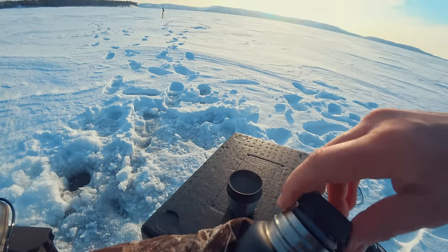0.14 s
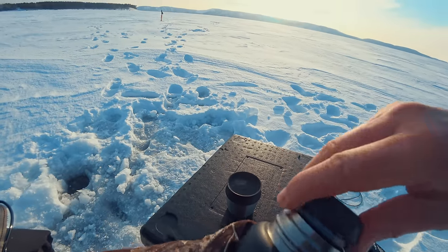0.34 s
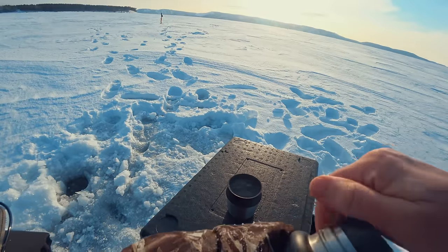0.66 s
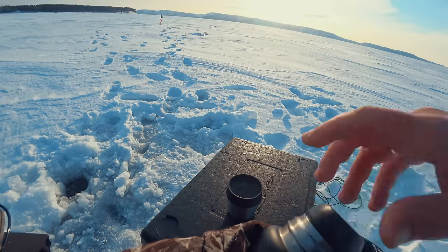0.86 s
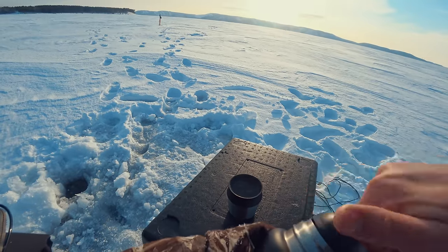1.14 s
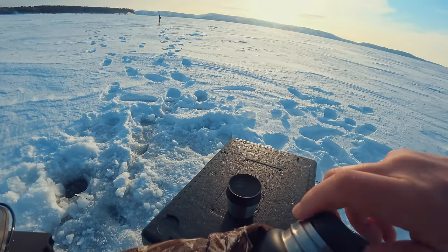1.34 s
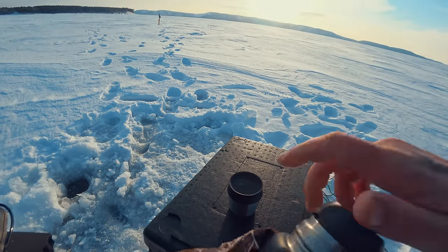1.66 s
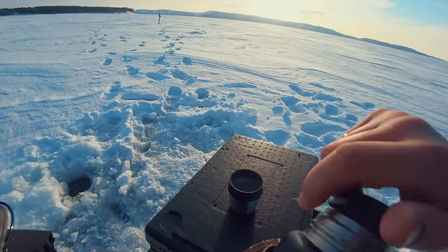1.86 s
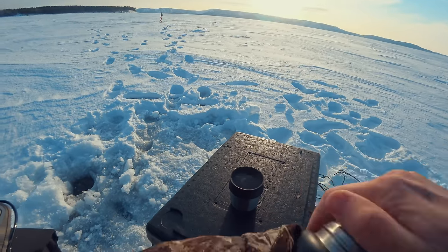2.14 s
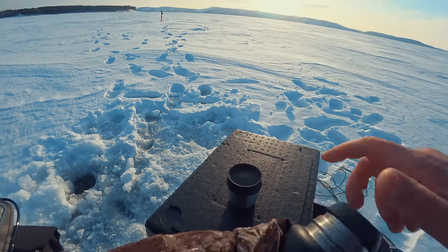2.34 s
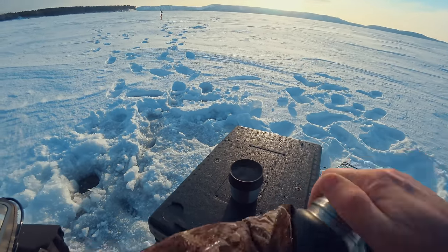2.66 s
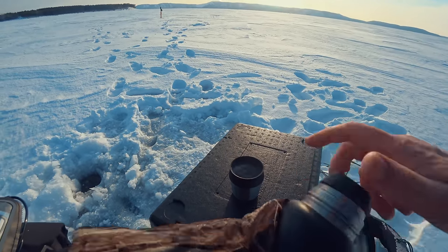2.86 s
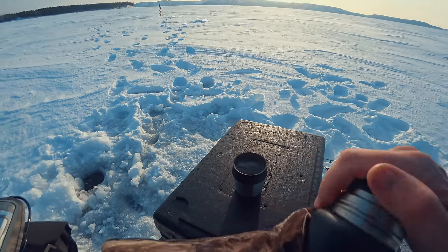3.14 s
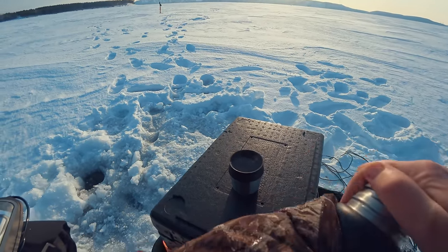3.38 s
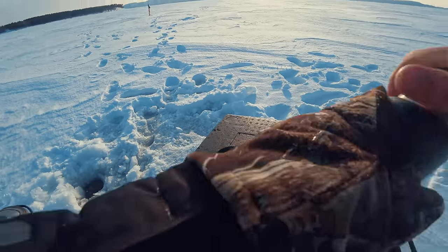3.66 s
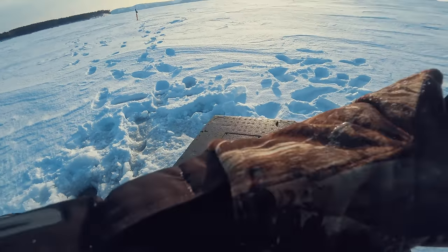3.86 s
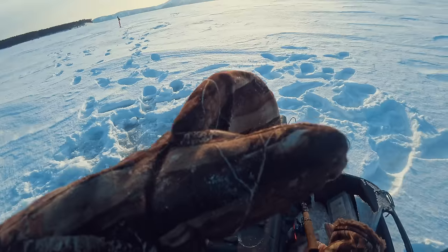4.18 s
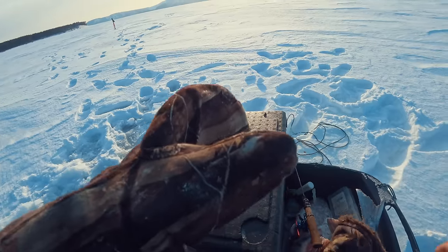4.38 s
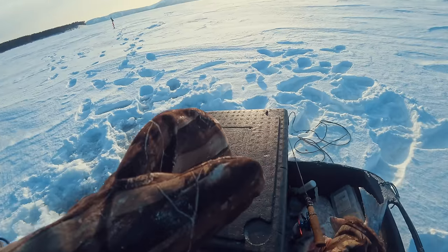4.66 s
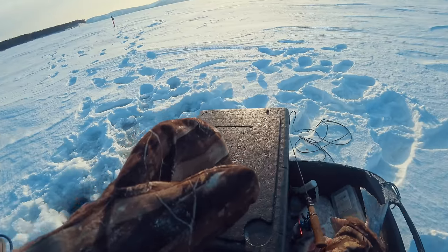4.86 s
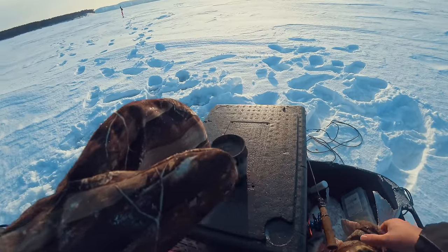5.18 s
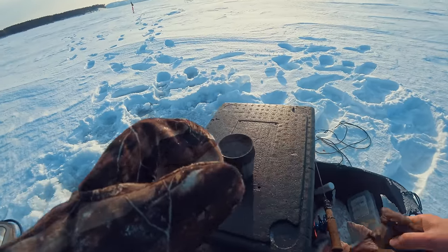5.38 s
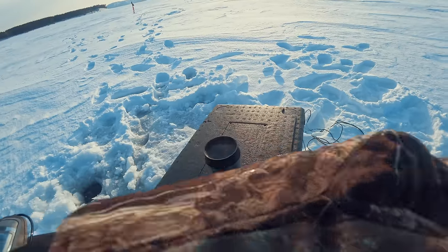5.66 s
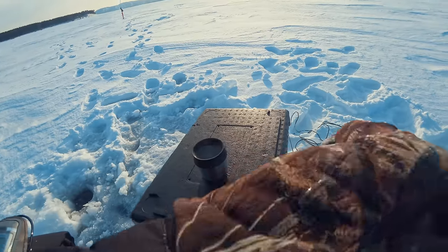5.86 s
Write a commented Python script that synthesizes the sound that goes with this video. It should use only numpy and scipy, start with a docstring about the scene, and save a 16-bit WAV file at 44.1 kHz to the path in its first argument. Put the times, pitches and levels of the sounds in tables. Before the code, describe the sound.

A plastic stopper clacks into a steel flask and twists tight with rubbery squeaks, then a cup knocks on a foam box as jacket fabric rustles.

```python
"""Outdoors on snow, close up: a plastic stopper clacks into the neck of a steel flask and is twisted tight
with rubbery squeaks and a judder, then a steel cup is set down on a foam box; a faint high squeak comes near
the end and a nylon jacket rustles over a light wind. Blows mix noise bursts, decaying steel modes and
resonant soft bodies; squeaks and judder are coloured pulse trains; scrapes, cloth and wind are shaped noise."""
import sys
import numpy as np
from scipy import signal
from scipy.fft import rfft, irfft, next_fast_len
from scipy.io import wavfile
from scipy.ndimage import uniform_filter1d, map_coordinates

SR = 44100
rng = np.random.default_rng(int(sys.argv[2]) if len(sys.argv) > 2 else 0)


def pcm_store(signal):
    """Save signal as 16-bit PCM."""
    levels = np.round(np.clip(np.atleast_2d(signal), -1, 1) * 32767)
    wavfile.write(sys.argv[1], SR, levels.astype(np.int16).T)


def undo_db(level):
    """Turn decibels back into plain size, where 20 dB means ten times bigger."""
    steps = np.asarray(level, float) / 20
    return 10 ** steps


N = 265482

# flask wall modes: (frequency [Hz], relative level [dB], t60 [s])
FLASK_MODES = [(1154, -21.5, 0.09), (1673, -44, 0.057), (2500, -18.5, 0.13), (2780, -25.5, 0.26),
               (3000, -21, 0.089), (3318, -19.5, 0.25), (3403, -5, 0.056), (3990, -26.5, 0.1),
               (4270, -26.5, 0.17), (7410, -2.5, 0.087), (12050, -1, 0.037)]
# steel cup modes: (frequency [Hz], relative level [dB], t60 [s])
CUP_MODES = [(1436, -11.5, 0.062), (1830, -2, 0.023), (2480, -29, 0.47), (2780, -23, 0.29),
             (3050, -15.5, 0.33), (3290, -32, 0.27), (5430, -35, 0.15), (3890, -15, 0.2), (4570, -27, 0.19),
             (6200, -5, 0.16), (7180, -15, 0.23), (7983, -3, 0.21), (8100, -2, 0.16), (9800, 2, 0.09),
             (10800, -1, 0.14), (11230, -4, .1)]
# colour of first contact and of foam scuffing: (frequency [Hz], relative level [dB])
CONTACT_COLOUR = [(240, -54), (400, -4), (904, -7), (2160, -7), (2870, 1.5), (3370, 1), (4130, -8.5),
                  (6000, -27), (7800, -71), (13200, -120)]
# stereo width: (frequency [Hz], side re mid [dB])
SIDE_SPREAD = [(60, -31), (180, -18), (550, -12.5), (1650, -12.5), (4970, -13), (15000, -3)]


def clacks():
    """Stopper knocks on the flask neck: steel rings, plastic body resonates."""
    # (time [s], blow level [dB], knock re blow [dB], treble re blow [dB], ring re blow [dB])
    contacts = [(0.6423, -1.5, -25, -17, -5.5), (0.6464, -2, -15.5, -25, -29),
                (0.6596, -17.5, -6.5, -28, -7), (0.6792, -17.5, -6, -13, 1), (0.7241, -10, -15, -19, -3.5),
                (0.7384, -15.5, -7, -17, -10), (0.7437, -2, -14, -21, -17), (0.7921, -5.5, -14, -13, -2),
                (0.8157, -10, -12.5, -23, -8), (0.828, -9.5, -22, -26, -30), (0.835, -4.5, -15, -31, -4.5),
                (0.8743, -24, -9, -40, -7), (0.9514, -33, -3, -18, -11), (0.9701, -14.5, -18, -36, -4.5),
                (1.0186, -20.5, -7.5, -29, -15), (1.0363, -4, -14.5, -26, -7.5),
                (1.059, -10.5, -9.5, -20, -23), (1.0808, -17, -9, -18, -24), (1.1364, -14, -7.5, -25, -3),
                (1.209, -38, -7, -24, 3), (1.4293, -9, -19.5, -27, -14), (1.4443, -22, -10.5, -18, -20),
                (1.4894, -12.5, -21.5, -18, -1.5), (1.6265, -33, -30, -30, -17),
                (1.6418, -9.5, -18.5, -22, -18.5), (1.8442, -27.5, -0.5, -8, -4),
                (2.0231, -16.5, -13.5, -30, -10), (2.0414, -39, -18, -24, -17), (2.8444, -28, -23, -4, -10),
                (2.9153, -27.5, -2.5, -19, -14), (3.021, -30.5, -23, -12, -10)]
    # stopper body: (frequency [Hz], width [Hz], relative level [dB])
    stopper = [(243, 153, 1.5), (634, 81, 8.5), (1020, 76, 6.5)]
    return blows(contacts, FLASK_MODES, stopper, crack_t60_s=0.022, push_t60_s=0.035, contact_s=0.00022,
                 body_db=11.5, treble_ring_db=-23)


def squeaks():
    """Rubbery squeaks: stopper twists and, near the end, a faint high squeak, all resonant pulse trains."""
    # one table a squeak: (time [s], pulse rate [1/s], level [dB], roughness [0-1],
    # strength alternation [0-1])
    squeak_courses = [
        [(1.128, 1500, -48, .5, .2), (1.146, 1550, -25, .3, .2), (1.154, 1560, -9, .08, .1),
         (1.163, 1560, -29, .2, .1)],
        [(1.468, 920, -18.5, .4, .2), (1.491, 1050, -17.5, .35, .2)],
        [(2.109, 1010, -17, .3, .2), (2.12, 1060, -20, .06, .1), (2.13, 1160, -16, .05, .5),
         (2.143, 1260, -13, .08, .6), (2.149, 1340, -17, .35, .5), (2.165, 1420, -14, .3, .3),
         (2.176, 1470, -15, .2, .3), (2.182, 1530, -22, .2, .4), (2.2, 1590, -18, .12, .7),
         (2.213, 1600, -24, .2, .5), (2.224, 1600, -14, .08, .8), (2.231, 1420, -19, .2, .4),
         (2.24, 1450, -12, .1, .4), (2.251, 1490, -16.5, .2, .4)],
        [(2.515, 875, -44, .05, .05), (2.57, 885, -42, .07, .05)],
        [(2.679, 1480, -12, .3, .3), (2.685, 1555, -13, .06, .2), (2.697, 1610, -15, .05, .2),
         (2.707, 1675, -12, .04, .3), (2.713, 1695, -15, .06, .35), (2.72, 1680, -12, .05, .3),
         (2.733, 1570, -16.5, .12, .25), (2.74, 1430, -15, .08, .1), (2.742, 1200, -15, .06, .05),
         (2.753, 1100, -24, .08, .05)],
        [(5.915, 2485, -31, .12, .05), (5.945, 2515, -34, .15, .05)],
    ]
    # (frequency [Hz], relative level [dB])
    squeak_colour = [(300, -32), (780, -20.5), (1100, -4.5), (1600, -16.5), (2000, -11), (2400, -2.5),
                     (2900, 2), (3400, 0), (3900, -8.5), (4300, -11), (5050, -24.5), (5700, -18),
                     (6600, -38), (8200, -28.5), (12200, -42), (16000, -61)]
    onset_s, release_s, slack_db, slack_rough = 0.004, 0.008, -27, 0.5
    lurch_db = 12  # at roughness 1, per unit of the lurch curve
    train, taps = np.zeros(N), np.arange(-7, 9)
    waver = np.clip(1 + 0.6 * wobble(150), 0, 2)  # strong-weak pattern comes and goes
    lurch = wobble(330)  # rough squeaks lurch in level

    def slack(row, shift_s):
        return row[0] + shift_s, row[1], row[2] + slack_db, slack_rough, row[4]

    for rows in squeak_courses:
        padded = [slack(rows[0], -onset_s), *rows, slack(rows[-1], release_s)]
        s, rate, db, rough, uneven = np.transpose(padded)
        when, size = slips(s, rate, rough)
        at = (when * SR).astype(int)
        level_db = np.interp(when, s, db) + lurch_db * np.interp(when, s, rough) * lurch[at]
        sign = (-1.) ** np.arange(len(when))
        alternation = 1 + np.interp(when, s, uneven) * waver[at] * sign
        size = size * undo_db(level_db) * alternation
        # windowed sinc pulses keep the timing finer than a sample
        index = at[:, None] + taps
        offset = index - when[:, None] * SR
        pulses = size[:, None] * np.sinc(offset) * np.cos(np.pi * offset / 16) ** 2
        train += np.bincount(index.ravel(), pulses.ravel(), N)
    return rung(causal(train, squeak_colour), wall_db=-39, treble_db=8)


def judder():
    """A tight twist jolts: each slip is a pulse plus a rubbing burst lasting a few milliseconds."""
    # (time [s], jolt rate [1/s], level [dB], roughness [0-1])
    jolt_course = [(3.2698, 155, -16.5, 0.04), (3.308, 153, -16, 0.02), (3.316, 200, -15.5, 0.44),
                   (3.33, 300, -19.5, 0.3), (3.341, 190, -18, 0.15), (3.368, 200, -20, 0.22),
                   (3.381, 310, -37, 0.5)]
    # jolt heard through stopper and flask: (frequency [Hz], relative level [dB])
    jolt_colour = [(59, -51), (100, -39), (156, -8.5), (308, -28), (398, -23), (535, -8.5), (691, -12.5),
                   (1100, -13), (2080, -15), (3050, 2), (6020, -33.5), (16000, -50)]
    s, rate, db, rough = np.transpose(jolt_course)
    when, size = slips(s, rate, rough)
    jolts = np.bincount((when * SR).astype(int), size * undo_db(np.interp(when, s, db)), N)
    peak_s = 0.0011
    u = np.arange(SR // 50) / SR / peak_s
    shape = u * np.exp(-u)
    envelope = signal.fftconvolve(jolts, shape / np.linalg.norm(shape))[:N]
    rubbing = envelope * rng.standard_normal(N)
    mixed = 0.69 * rubbing + 0.8 * jolts
    return rung(causal(mixed, jolt_colour), wall_db=-39, treble_db=9)


def hiss():
    """Stopper thread rubbing as it turns: grainy treble noise, one swell a stroke."""
    # (time [s], level [dB], 20 dB rise [s], hold [s], 20 dB fall [s])
    strokes = [(1.155, -31.5, 0.022, .002, 0.026), (1.468, -34.5, 0.0066, 0.015, 0.055),
               (2.11, -43, .008, 0.14, .04)]
    # (frequency [Hz], relative level [dB])
    thread_colour = [(3530, -30), (6000, -16), (6720, -11), (7740, -2), (9230, -15), (12400, 5.5),
                     (13600, -18), (15400, -13), (16300, -27)]
    grains = undo_db(3.0 * wobble(200)) * rng.standard_normal(N)
    return causal(swells(strokes) * grains, thread_colour)


def air_notes():
    """Air above the drink: decaying sines that bend as the flask tilts."""
    # (time [s], start [Hz], end [Hz], level [dB], t60 [s])
    notes = [(.648, 836, 807, -30, 1), (.792, 838, 806, -31.5, 0.45), (1.036, 818, 826, -34, 0.33),
             (1.47, 810, 840, -36.5, 0.36), (1.645, 860, 798, -34.5, .4), (2.53, 764, 683, -41, 0.76),
             (2.92, 788, 877, -35, 0.51)]
    out, t = np.zeros(N + SR), np.arange(SR // 4) / SR
    bend_s, damp_s = 0.0436, 0.078
    fade = np.minimum(1, (t[-1] - t) / damp_s)  # the grip damps it
    for s, start_hz, end_hz, db, t60_s in notes:
        hz = end_hz + (start_hz - end_hz) * np.exp(-t / bend_s)
        tone = np.sin(2 * np.pi * np.cumsum(hz) / SR)
        out[round(s * SR):][:len(t)] += undo_db(db - 60 * t / t60_s) * fade * tone
    return out[:N]


def drag():
    """Fingers drag over the flask: skin catches on steel in uneven noise grains."""
    # (time [s], level [dB], 20 dB rise [s], hold [s], 20 dB fall [s])
    strokes = [(1.936, -25.5, 0.05, 0.0089, 0.15)]
    # (frequency [Hz], relative level [dB])
    skin_colour = [(88, -39), (150, -9), (649, -14.5), (759, -12), (837, -14), (1190, -5.5), (3220, -13.5),
                   (5050, -35.5), (10200, -30), (16000, -61)]
    grains = unit(undo_db(4.3 * wobble(180)) * rng.standard_normal(N))
    return causal(swells(strokes) * grains, skin_colour)


def snaps():
    """Cloth and finger snaps: a few rough cycles each, with a soft start."""
    # (time [s], level before low-pass [dB], frequency [Hz])
    snap_events = [(0.095, -54, 316), (0.3007, -40, 700), (1.342, -43.5, 350), (1.759, -25.5, 556),
                   (1.924, -16, 1800), (1.936, -12.5, 1270), (1.945, -10, 1220), (1.979, -19, 1080),
                   (2.059, -26, 1020), (2.589, -28.5, 417), (3.488, -26.5, 650), (3.539, -26, 454),
                   (3.574, -23, 600), (3.842, -30, 830), (4.036, -29, 397), (4.223, -32, 313),
                   (4.317, -30.5, 1050), (4.359, -27, 2610), (5.18, -34, 387), (5.183, -26, 1040),
                   (5.684, -20, 1660), (5.914, -24, 900)]
    peak_cycles = 0.94  # cycles from start to envelope peak
    out, t = np.zeros(N + SR), np.arange(SR // 20) / SR
    for s, db, hz in snap_events:
        u = t * hz / peak_cycles
        rough = 1 + 0.72 * rng.standard_normal(len(t))
        out[round(s * SR):][:len(t)] += undo_db(db) * u * np.exp(1 - u) * rough * np.sin(2 * np.pi * hz * t)
    return filtered(out[:N], lambda hz: 1 / (1 + 1j * hz / 4000) ** 2)


def setdowns():
    """Cup meets the foam box: steel rings, the lid thuds."""
    # (time [s], blow level [dB], thud re blow [dB], treble re blow [dB], ring re blow [dB])
    contacts = [(4.6905, -11.5, -7.5, -3, -28), (4.6938, -2, -23, -6.5, -9.5), (4.7045, -12, -5, -6, -7),
                (4.812, -30.5, -8, -12, -1), (4.8738, -30.5, -9, -3, -10), (4.897, -22, -9, -11, -21),
                (4.9102, -22.5, -9, -22, -8), (4.9486, -16.5, -2, -19, -32), (4.9546, -8.5, -14, -10, -18),
                (4.9908, -13, -2.5, -22, -8.5), (5.034, -15.5, -8, -9, -21), (5.0504, -5, -7, -20, -9.5),
                (5.0607, -16, -9, -24, -29), (5.079, -16.5, -3.5, -17, -19),
                (5.163, -25.5, -10.5, -28, -25), (5.268, -37, 1, -22, -17), (5.4147, -22.5, -21, -7.5, -17),
                (5.456, -18.5, -30, -4.5, -16)]
    # foam box lid: (frequency [Hz], width [Hz], relative level [dB])
    lid = [(97, 48, -2.5), (203.3, 20, 6.5), (287, 58, -0.5), (506, 176, -6.5), (690, 230, -8),
           (950, 53, -8), (1240, 460, -12)]
    return blows(contacts, CUP_MODES, lid, crack_t60_s=0.03, push_t60_s=0.086, contact_s=0.00039,
                 body_db=18, treble_ring_db=-22)


def slide():
    """Cup rim scuffs the foam: noise grains that keep the cup modes ringing."""
    # (time [s], level [dB], 20 dB rise [s], hold [s], 20 dB fall [s])
    strokes = [(4.81, -45.5, 0.05, .002, 0.054), (4.9, -36, 0.085, 0.013, 0.06),
               (5.04, -30.5, 0.036, .002, 0.018)]
    grains = swells(strokes) * unit(undo_db(2.4 * wobble(250)) * rng.standard_normal(N))
    ring = signal.fftconvolve(grains, ringing(CUP_MODES, treble_db=-10, scatter_db=0))[:N]
    return causal(grains, CONTACT_COLOUR) + undo_db(-30.5) * ring


def jacket():
    """One arm movement creases the folds low, rubs the sleeves mid-band and swishes on top."""
    # (time [s], rubbing level [dB])
    movement = [(0.0, -54.5), (0.3, -56.5), (0.6, -48), (0.85, -46.5), (0.95, -54.5), (1.17, -51),
                (1.24, -56.5), (1.42, -56), (1.55, -50.5), (1.81, -47), (1.94, -37), (2.1, -43),
                (2.31, -49.5), (2.8, -43), (3.2, -48.5), (3.47, -37.5), (3.67, -34.5), (3.8, -37),
                (3.89, -44.5), (4.05, -40.5), (4.18, -42.5), (4.31, -48.5), (4.49, -45.5), (4.76, -47.5),
                (4.91, -50.5), (5.1, -48.5), (5.31, -44.5), (5.55, -47.5), (5.68, -34.5), (5.82, -30.5),
                (6.02, -38)]
    # three colours: (frequency [Hz], relative level [dB])
    crease_colour = [(59, -55), (100, -2.5), (874, -2.5), (935, -3), (1330, -8), (2240, -13.5),
                     (2500, -8.5), (3250, -11), (5500, -60)]
    rub_colour = [(800, -11), (1300, -12), (1800, -4.5), (2500, -1.5), (3000, -2.5), (3800, -5),
                  (4600, -10), (6000, -16.5), (8500, -18), (14000, -120)]
    swish_colour = [(3240, 0.5), (5500, -5.5), (6250, -8.5), (7560, 1), (10200, 0), (11500, -4),
                    (15200, -14), (16300, -29)]
    rub_db = curve(movement)
    above_rest_db = rub_db + 46
    crease_db = -43.5 + 0.85 * above_rest_db
    swish_db = -53 + 1.046 * above_rest_db
    cloth = undo_db(crease_db) * crinkle(crease_colour, patchy_db=2.0, grain_db=2.0)
    cloth += undo_db(rub_db) * crinkle(rub_colour, patchy_db=1.0, grain_db=1.5)
    cloth += undo_db(swish_db) * crinkle(swish_colour, patchy_db=1.6, grain_db=1.5)
    left_re_right_db = 1 + 0.24 * wobble(4.11)
    return cloth * undo_db([left_re_right_db / 2, -left_re_right_db / 2])


def wind():
    """Light wind: drifting low noise, almost alike in both ports."""
    # (time [s], level [dB])
    wind_level = [(0.0, -49), (0.35, -48), (1.0, -47), (2.2, -51.5), (2.6, -44.5), (3.3, -50.5),
                  (4.26, -47.5), (4.86, -47), (5.38, -48), (6.02, -47.5)]
    # (frequency [Hz], relative level [dB])
    rumble_colour = [(8.8, -24), (15, -3), (40, -5), (78, -5), (108, -15.5), (250, -25), (320, -67),
                     (550, -120)]
    level_db = curve(wind_level) + 1.4 * wobble(5.23)
    return undo_db(level_db) * crinkle(rumble_colour, patchy_db=1.8, grain_db=1.4)


def blows(events, modes, body, crack_t60_s, push_t60_s, contact_s, body_db, treble_ring_db):
    """Each contact cracks, rings the steel and pushes the soft body under it."""
    # treble edge of a contact: (frequency [Hz], relative level [dB])
    tick_colour = [(3240, -15), (5500, -13.5), (7930, 0.5), (8870, -4), (11900, -4), (16000, -26)]
    hard_ring = 0.4  # dB of treble ring per dB of blow
    t = np.arange(SR // 3) / SR
    steel, crack, tick, push = np.zeros((4, N + SR))
    shove = t / contact_s * np.exp(1 - t / contact_s)
    for s, db, low_db, high_db, ring_db in events:
        at = slice(round(s * SR), round(s * SR) + len(t))
        steel[at] += undo_db(db + ring_db) * ringing(modes, treble_ring_db + hard_ring * db, scatter_db=3.5)
        noise = undo_db(db) * rng.standard_normal((3, len(t)))
        crack[at] += 0.36 * undo_db(-60 * t / crack_t60_s) * noise[0]
        tick[at] += 0.43 * undo_db(high_db - 60 * t / crack_t60_s) * noise[1]
        force = undo_db(-60 * t / push_t60_s) * noise[2] + 0.48 * undo_db(db) * shove
        push[at] += undo_db(low_db + body_db) * force

    def soft_body(f):
        total = 0
        for k, (centre, width, gain_db) in enumerate(body):
            resonance = 1j * f * width / (centre * centre - f * f + 1j * f * width)
            total = total + (-1) ** k * undo_db(gain_db) * resonance
        radiation = (1j * f / (70 + 1j * f)) ** 2  # small bodies radiate no deep bass
        return total * radiation

    contact = causal(crack, CONTACT_COLOUR) + causal(tick, tick_colour)
    return (steel + contact)[:N] + filtered(push[:N], soft_body)


def ringing(modes, treble_db, scatter_db):
    """Thin steel: decaying, beating modes with randomly scattered strengths."""
    t = np.arange(SR // 3) / SR
    hz, level_db, t60_s = np.transpose(modes)[:, :, None]
    level_db = level_db + treble_db * (hz > 6000) + scatter_db * rng.standard_normal(hz.shape)
    beat_hz, phase = rng.uniform(15, 45, hz.shape), rng.random(hz.shape)
    beat = 1 + 0.35 * np.sin(2 * np.pi * (beat_hz * t + phase))  # split mode pairs
    return np.sum(undo_db(level_db - 60 * t / t60_s) * beat * np.sin(2 * np.pi * hz * t), axis=0)


def rung(x, wall_db, treble_db):
    """Rubbing plus the flask modes excited by it."""
    wall = signal.fftconvolve(x, ringing(FLASK_MODES, treble_db, scatter_db=0))[:N]
    return x + undo_db(wall_db) * wall


def slips(s, rate, rough):
    """Times [s] and sizes of stick-slip releases, scattered by roughness."""
    t = np.arange(s[0], s[-1], 1 / SR)
    turns = np.cumsum(np.interp(t, s, rate)) / SR
    when = np.interp(np.arange(int(turns[-1]) + 1), turns, t)
    luck = rng.standard_normal((len(when), 2))
    per_s = np.interp(when, s, rate)
    rough = np.clip(np.interp(when, s, rough), 0, 1)
    size = undo_db(8 * rough * luck[:, 1]) * np.sqrt(SR / per_s)  # even power at any rate
    return when + 0.5 * rough * luck[:, 0] / per_s, size


def swells(strokes):
    """Summed gain of strokes that rise, hold and fall along straight lines in dB."""
    t = np.arange(N) / SR
    gain = np.zeros(N)
    for s, db, rise_s, hold_s, fall_s in strokes:
        away = np.maximum((s - t) / rise_s, (t - s - hold_s) / fall_s)
        gain += undo_db(db - 20 * np.maximum(0, away))
    return gain


def crinkle(spectrum, patchy_db, grain_db):
    """Stereo noise, mid rms 1, in random time-frequency patches roughened by short grains."""
    grain_level_db = grain_db * wobble(300) + patchy_db * wobble(25)
    raw = rng.standard_normal((2, N)) * undo_db(grain_level_db)
    z = signal.stft(raw, nperseg=512)[2]
    field = uniform_filter1d(rng.standard_normal(z.shape[1:]), 6, 0)
    field = uniform_filter1d(field, 8, 1)
    pair = signal.istft(z * undo_db(patchy_db * unit(field)), nperseg=512)[1][:, :N]
    mid, side = filtered(pair, lambda hz: undo_db(along(spectrum, hz) + [0 * hz, along(SIDE_SPREAD, hz)]))
    return np.array([mid + side, mid - side]) / np.std(mid)


def placed(x, balance, lead, scatter_db):
    """Source at the ports plus weak reflections off hands and snow that differ between them."""
    t = np.arange(SR // 40) / SR
    echo = rng.standard_normal(len(t)) * undo_db(-60 * t / 0.02)
    near = signal.fftconvolve(x, echo / np.linalg.norm(echo))[:N]
    side = filtered(near, lambda hz: undo_db(along(SIDE_SPREAD, hz) + scatter_db))
    return ports(x, balance, lead) + [side, -side]


def ports(x, balance, lead):
    """Left-right level tilt and phase lead by frequency at two microphone ports."""
    half = np.array([[0.5], [-0.5]])
    return filtered(x, lambda hz: undo_db(along(balance, hz) * half) * np.exp(1j * along(lead, hz) * half))


def causal(x, spectrum, size=2048):
    """Minimum-phase colouring with unit energy, so that hits keep a sharp start."""
    cep = irfft(np.log(undo_db(along(spectrum, np.fft.rfftfreq(size, 1 / SR))) + 1e-4))
    cep[1:size // 2] *= 2
    cep[size // 2 + 1:] = 0
    kernel = irfft(np.exp(rfft(cep)))
    return signal.fftconvolve(x, kernel / np.linalg.norm(kernel))[:len(x)]


def filtered(x, response):
    """x times a complex response of frequency [Hz]."""
    m = next_fast_len(N + SR // 2)
    return irfft(rfft(x, m) * response(np.fft.rfftfreq(m, 1 / SR)), m)[..., :N]


def along(points, hz):
    """Read (frequency [Hz], value) points on a log axis."""
    f, v = np.transpose(points)
    return np.interp(np.log(hz + 1), np.log(f + 1), v)


def curve(rows):
    """Read (time [s], value) points at every sample."""
    s, value = np.transpose(rows)
    return np.interp(np.arange(N) / SR, s, value)


def wobble(rate_hz):
    """Smooth random curve with rate_hz knots a second."""
    knots = rng.standard_normal(int(N * rate_hz / SR) + 4)
    return map_coordinates(knots, [np.arange(N) * rate_hz / SR])


def unit(x):
    """Scale to rms 1."""
    return x / np.sqrt(np.mean(x ** 2) + 1e-20)


def scene():
    """Flask in the hands, cup on the box, jacket and wind around."""
    # port balance: (frequency [Hz], left re right [dB])
    flask_balance = [(200, 0.75), (1000, -0.8), (3000, -0.52), (6000, 1), (14000, .5)]
    cup_balance = [(200, 0.92), (1000, .3), (3000, .3), (6000, 2.1), (14000, .5)]
    # port phase: (frequency [Hz], left lead [rad])
    flask_lead = [(0, -0.8), (1550, 0.42), (9300, -0.5), (12100, -0.9), (13700, -0.5), (15100, -0.7),
                  (15800, -0.3), (16100, -0.4)]
    cup_lead = [(0, 0.14), (6200, -0.086), (9730, -0.65), (10500, -0.81), (12900, -0.8), (13700, -0.5),
                (14000, -0.9), (16100, 0.1)]
    jacket_lead = [(0, 0), (5510, 0.34), (6120, 1.5), (6800, 0), (8960, 0), (13100, 0.86), (15500, 1.5),
                   (16100, 1.2)]
    handling = clacks() + squeaks() + judder() + hiss() + air_notes() + drag() + snaps()
    cup = setdowns() + slide()
    mix = placed(handling, flask_balance, flask_lead, scatter_db=-8.0)
    mix += placed(cup, cup_balance, cup_lead, scatter_db=-4)
    mix += ports(jacket(), [(1000, 0.1)], jacket_lead)
    return mix + wind()


def low_pass(x):
    """Removes everything above the highest recorded frequency."""
    return signal.sosfilt(signal.butter(12, 16520, fs=SR, output="sos"), x)


def record(dry):
    """Small microphone: soft overload towards a ceiling."""
    ceiling = 0.9
    mix = dry / (1 + np.abs(dry / ceiling) ** 8) ** (1 / 8)
    return low_pass(mix)


dry = scene()
out = record(dry)
pcm_store(out)
```